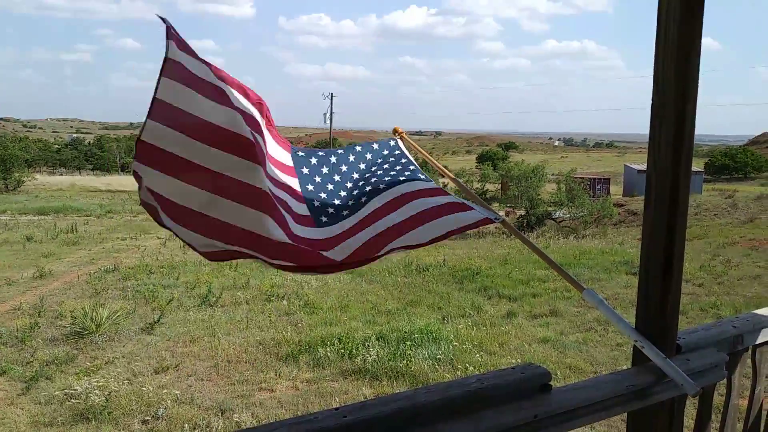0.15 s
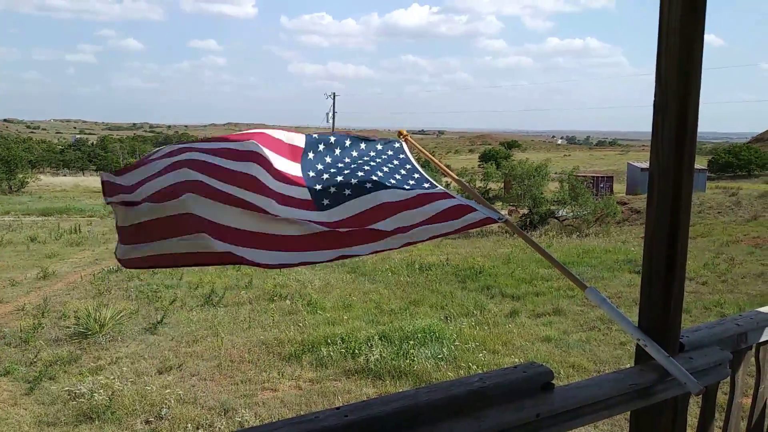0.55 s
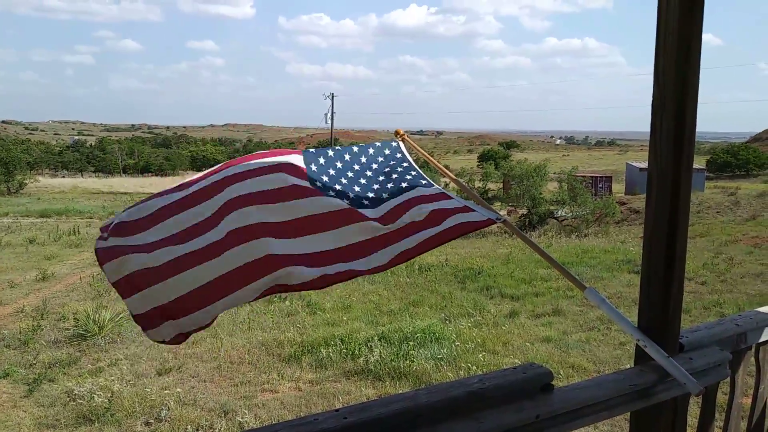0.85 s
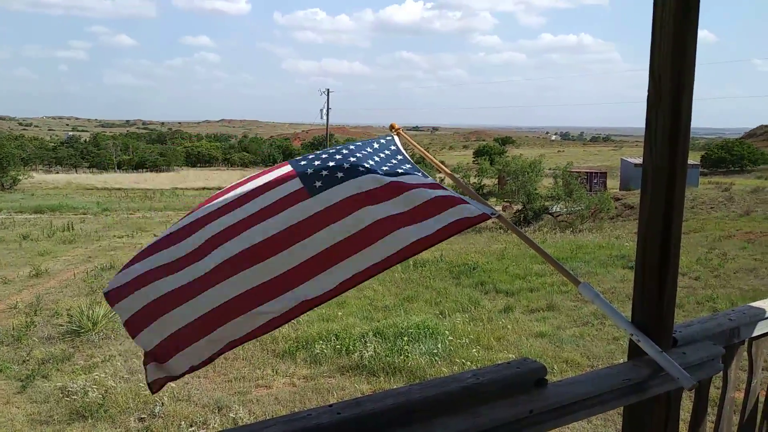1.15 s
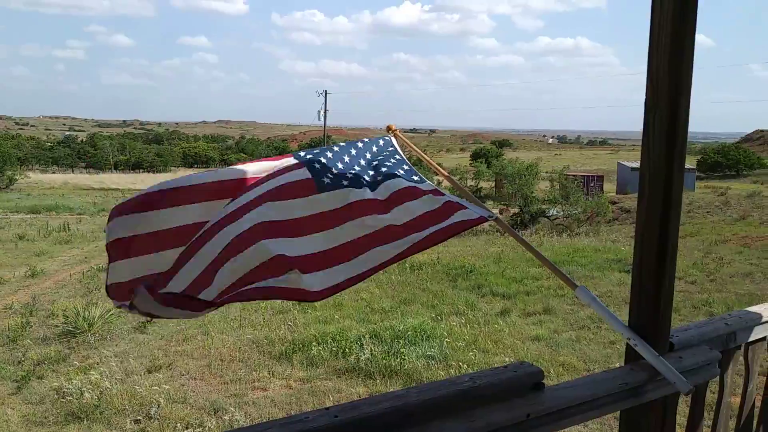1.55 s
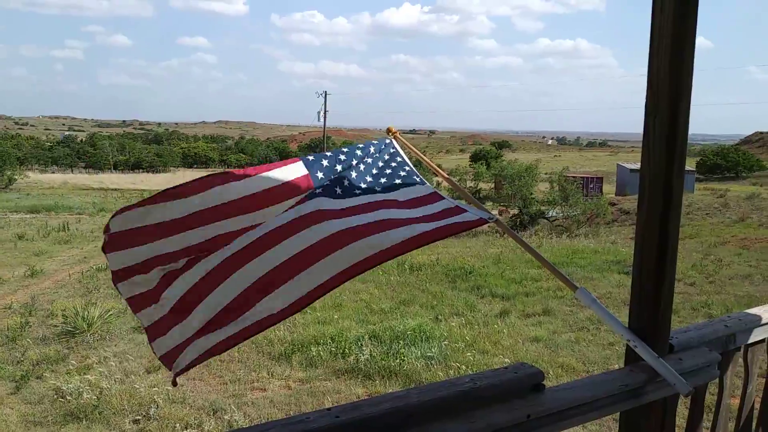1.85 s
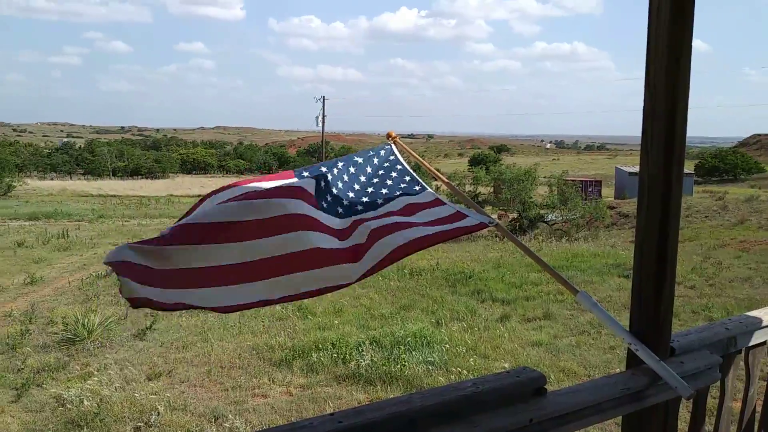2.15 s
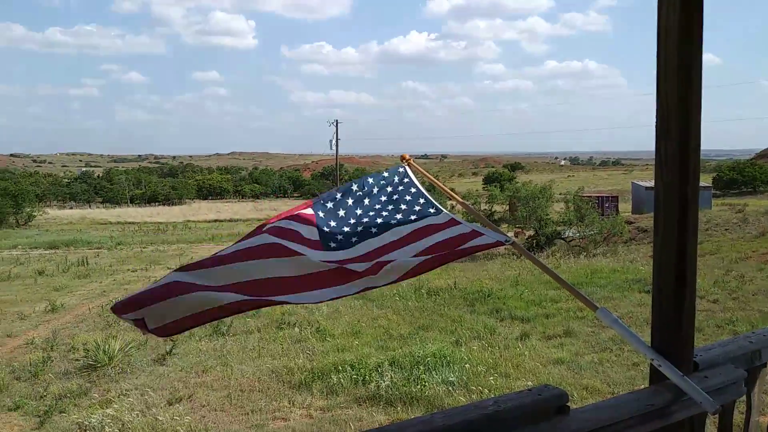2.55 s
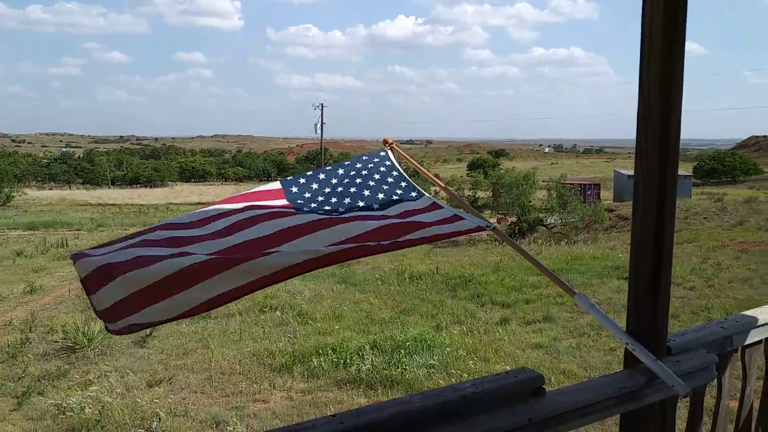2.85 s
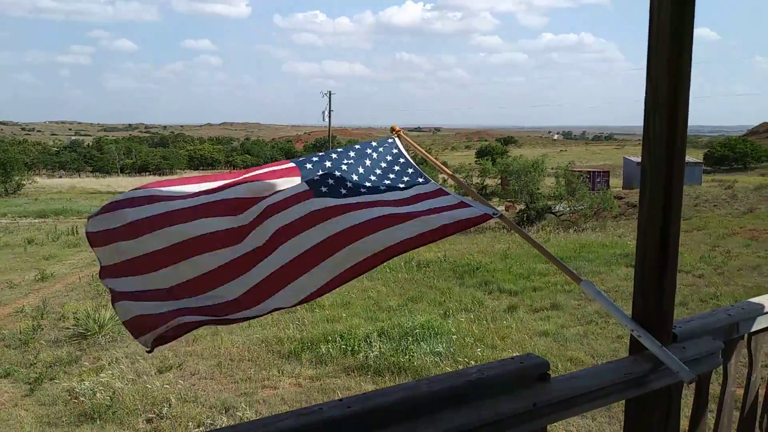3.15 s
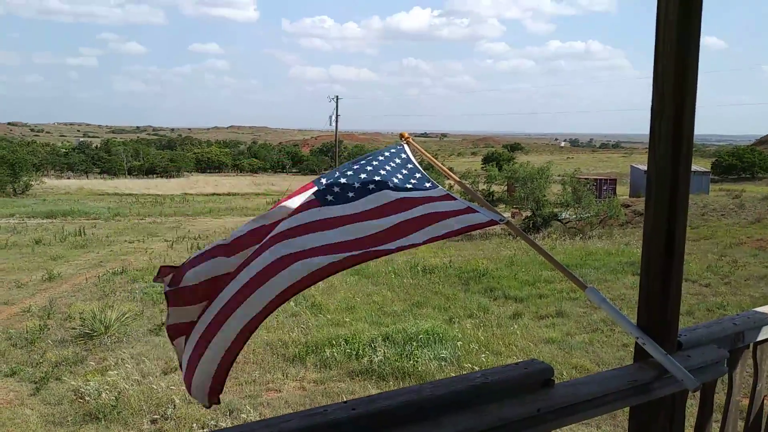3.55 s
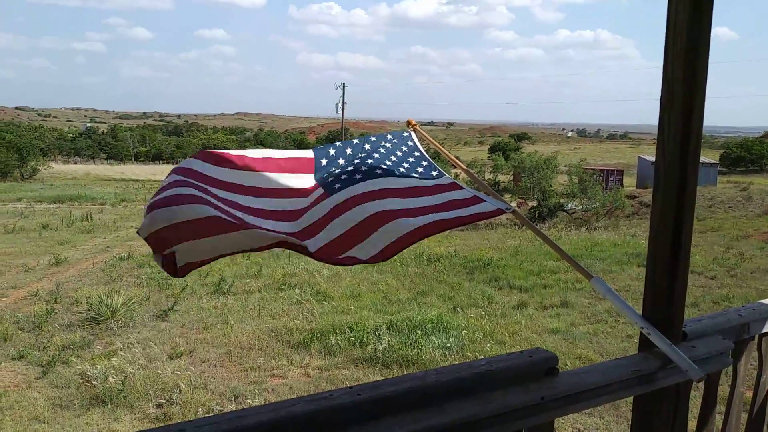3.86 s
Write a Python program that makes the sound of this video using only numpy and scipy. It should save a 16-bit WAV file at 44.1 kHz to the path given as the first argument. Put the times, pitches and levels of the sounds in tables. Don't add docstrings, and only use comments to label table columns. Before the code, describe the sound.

Outdoor wind noise beside a cloth flag: quiet rumble and faint ticks for nearly two seconds, then a sudden overloaded gust with heavy slaps, later scattered thumps fading to light rush and faint bird chirps.

```python
import sys
import numpy as np
from scipy import signal
from scipy.fft import rfft, irfft
from scipy.io import wavfile
from scipy.ndimage import uniform_filter1d, minimum_filter1d

SR = 44100
rng = np.random.default_rng(int(sys.argv[2]) if len(sys.argv) > 2 else 0)


def voltage_ratio(level):
    return 10 ** (np.asarray(level, float) / 20)


def bounce(signal):
    frames = np.transpose(np.atleast_2d(signal))
    limited = np.clip(frames, -1, 1)
    pcm = np.round(limited * 32767).astype(np.int16)
    wavfile.write(sys.argv[1], SR, pcm)


N = 176400

# (centre [s], width [s], level [dB], edge of the rumble [Hz])
LIGHT_EDDIES = [(0.056, 0.05, -24, 197), (0.108, 0.053, -25.5, 209), (0.178, 0.058, -27, 180),
                (0.615, 0.017, -22, 237), (0.712, 0.034, -25.5, 233), (1.159, 0.047, -25.5, 314),
                (1.214, 0.049, -26, 190), (1.278, 0.02, -20.5, 268), (1.462, 0.015, -25, 280),
                (1.615, 0.023, -32, 188)]
GUST_EDDIES = [(1.914, 0.019, -9.5, 246), (1.959, 0.067, -6, 347), (2.008, 0.03, -1, 380),
               (2.051, 0.025, -6.5, 240), (2.13, 0.019, 2.5, 640), (2.152, 0.013, 7, 272),
               (2.174, 0.008, -4, 284), (2.201, 0.034, -3, 365), (2.291, 0.011, -8.5, 426),
               (2.347, 0.028, -6, 450), (2.376, 0.018, -8.5, 510), (2.421, 0.035, -8, 390),
               (2.447, 0.0057, -6.5, 338), (2.501, 0.014, -6.5, 246), (2.52, 0.025, -7, 487),
               (2.554, 0.027, -5.5, 267), (2.61, 0.046, -11.5, 250), (2.647, 0.015, 0, 196),
               (2.674, 0.014, 2, 261), (2.739, 0.0096, -5.5, 290), (2.829, 0.052, -14.5, 370),
               (2.862, 0.004, -13.5, 257), (2.893, 0.0068, -8, 236),
               (2.964, 0.035, -13, 410), (3.004, 0.0046, -8, 405), (3.048, 0.0092, -12.5, 415),
               (3.061, 0.032, -9.5, 233), (3.098, 0.0069, -16, 410), (3.14, 0.019, -1, 336),
               (3.16, 0.0054, 4, 303), (3.187, 0.014, -9.5, 262), (3.256, 0.011, -18, 225),
               (3.299, 0.012, -9, 257), (3.327, 0.03, -13, 256), (3.409, 0.052, -9.5, 258),
               (3.482, 0.0083, -7.5, 220), (3.545, 0.044, -18, 249), (3.58, 0.018, -7, 287),
               (3.614, 0.039, -12, 356), (3.69, 0.036, -27, 217), (3.768, 0.021, -22, 362),
               (3.826, 0.021, -21, 333), (3.864, 0.014, -15.5, 348), (3.908, 0.025, -12.5, 178),
               (3.96, 0.087, -25.5, 219)]
EDDY_FLOOR_HZ, EDDY_EDGE_SHARE, EDDY_FALL = 49, 0.89, 1.78
EDDY_LUMPS_DB, EDDY_FIZZ_DB, FIZZ_REACH = 4, -31.5, 3.5

# (time [s], height over full scale [dB], pitch [Hz], gain afterwards [dB])
SLAPS = [
    (1.9624, -3, 250, -2),
    (1.9696, 1, 330, -7),
    (2.0072, 6, 300, -8.5),
    (2.1400, 8, 350, -4),
    (2.1545, 4, 200, -7),
    (2.2920, 1, 300, -7),
    (2.4222, 20, 360, -7.5),
    (2.6440, -1, 160, -4),
    (3.1600, 0, 180, -2.5),
    (3.5784, 0, 200, -2.5),
]

# (time [s], peak [dB], edge [Hz], length [s])
FLUTTERS = [(1.892, -24, 700, 0.018), (1.939, -20, 800, 0.011), (1.956, -13, 1000, 0.019),
            (2.003, -2.5, 653, 0.0061), (2.077, -30.5, 700, .012), (2.096, -20, 693, 0.013),
            (2.121, 4.5, 1060, 0.011), (2.139, -0.5, 1100, 0.011), (2.191, -9.5, 650, 0.013),
            (2.285, -9.5, 515, .009), (2.346, -11.5, 800, 0.0084), (2.364, -22.5, 900, .006),
            (2.377, -11.5, 1200, 0.0046), (2.418, -2.5, 900, 0.0081), (2.502, -15.5, 600, 0.0085),
            (2.518, -6.5, 950, 0.012), (2.532, -12, 900, 0.01), (2.584, -23.5, 650, 0.014),
            (2.61, -17, 704, 0.016), (2.641, -15.5, 750, 0.0088), (2.667, -12, 750, 0.013),
            (2.732, -23.5, 650, 0.014), (2.812, -18.5, 700, .01), (2.834, -18.5, 750, 0.021),
            (2.888, -23, 690, 0.015), (2.9, -20, 800, 0.0087), (2.949, -17, 600, 0.019),
            (2.993, -19, 600, .008), (3.048, -12.5, 680, 0.0099), (3.092, -22, 650, .012),
            (3.133, -12, 850, 0.0094), (3.151, -14, 900, 0.022), (3.321, -20, 520, 0.013),
            (3.374, -29, 650, .013), (3.569, -20.5, 600, 0.023), (3.603, -19.5, 600, 0.017)]
FLUTTER_RISE_S, FLUTTER_FALL = 0.002996, 1.603
FLUTTER_FLOOR_HZ, FLUTTER_CEILING_HZ = 380, 3800

# (time [s], level [dB])
TURBULENCE_LEVEL = [(0, -26.5), (.2, -43), (.27, -66), (.6, -42), (.85, -59), (1.08, -35), (1.2, -28),
                    (1.5, -35.5), (1.7, -46), (1.86, -31), (1.9, -15), (2.3, -13.5), (2.6, -12),
                    (2.78, -20), (3.17, -14), (3.23, -29.5), (3.45, -18.5), (4, -31.5)]
# (frequency [Hz], level [dB])
PORT_SPECTRUM = [(25, -39), (45, 2.5), (65, 2.5), (200, -2), (400, -13), (800, -27), (2000, -46),
                 (5000, -110)]

# (time [s], level [dB])
RUSH_LEVEL = [(0, -37), (1, -37), (2, -37.5), (3, -40), (4, -38)]
# (time [s], level [dB])
GRASS_LEVEL = [(0, -57), (.8, -57), (1.8, -57.5), (2.3, -56), (2.7, -58), (3, -55), (3.4, -56.5), (4, -57)]
# (frequency [Hz], level [dB])
TREE_SPECTRUM = [(30, -11), (100, 4), (250, 5), (500, -4.5), (800, 2), (1500, -12), (2600, -13)]
GRASS_SPECTRUM = [(2950, -35), (3600, -21.5), (4400, -28.5), (5100, -30), (6700, -24), (9500, -31.5),
                  (12800, -48.5), (15800, -53)]
# (resonance [Hz], width [Hz], level [dB])
HOLLOWS = [(302, 11, -8.5), (410, 10, -6.5), (640, 31.4, -1.5), (750, 16, -10), (899, 51, -3.5),
           (1202, 100, -6), (1397, 12, -10), (1725, 59, -11.5), (1924, 130, -11.5), (2470, 64, -19),
           (2720, 120, -20)]

# (time [s], peak [dB], resonance [Hz], 60 dB decay [s])
TICKS = [
    (.1062, -39, 3850, .02),
    (0.416, -39, 3770, 0.046),
    (.432, -46, 5000, 0.027),
    (.765, -47, 5000, .02),
    (1.075, -38, 4700, 0.018),
    (1.285, -49, 4500, 0.0195),
    (1.665, -44, 4600, 0.022),
    (3.2206, -43, 3900, 0.017),
    (3.4887, -42, 9930, .014),
    (3.489, -38, 6300, 0.01),
]

# (start [s], length [s], start pitch [Hz], end pitch [Hz], level [dB])
CHIRPS = [
    (1.9, .03, 4200, 4550, -52),
    (2.925, .022, 4350, 4150, -55),
    (3.03, .025, 4350, 4150, -55),
    (3.06, .03, 3900, 3750, -59),
    (3.1, .05, 4250, 4250, -60),
    (3.56, .025, 4150, 4250, -58),
    (3.61, .035, 3950, 4150, -56),
    (3.78, .06, 4050, 4100, -59),
    (3.86, .075, 4180, 4320, -58),
]

# (time [s], level [dB])
INSECT_LEVEL = [(0, -83), (.5, -77), (.9, -80), (1.6, -78), (2, -82), (2.2, -89), (3.2, -85), (3.5, -78),
                (4, -82)]
INSECT_HZ, INSECT_PULSES_PER_S = 15400, 28

FULL_SCALE, BASS_CUT_HZ, CUTOFF_HZ = .893, 50, 15730
LIMITER_SHARE, LIMITER_SPAN = .8, 220
RECOVERY_DB_PER_S, GAIN_ATTACK_S = 32, .0015


def rms_one(x):
    return x / np.sqrt(np.mean(x ** 2) + 1e-20)


def in_time(rows):
    s, v = np.transpose(rows)
    return np.interp(np.arange(N) / SR, s, v)


def drift(rate):
    r = np.exp(-80 * np.pi * rate / SR)
    noise = rng.standard_normal(N // 40 + 2002)
    slow = signal.lfilter([1], [1, -2 * r, r * r], noise)[2000:]
    return np.interp(np.arange(N) / 40, np.arange(len(slow)), rms_one(slow))


def coloured(points):
    hz, db = np.transpose(points)
    grid_hz = np.arange(N // 2 + 1) * SR / N
    return voltage_ratio(np.interp(np.log(grid_hz + 1), np.log(hz), db))


def patchy(shape, shared_db, own_db, rate):
    octave = np.log2(np.arange(N // 2 + 1) * SR / N + 1)
    spectrum = rfft(rng.standard_normal(N)) * shape
    together, out = drift(rate), 0
    for centre in range(4, 15):
        share = np.clip(1 - abs(octave - centre), 0, 1)
        swell = voltage_ratio(shared_db * together + own_db * drift(rate))
        out = out + irfft(spectrum * share, N) * swell
    return rms_one(out)


def resonate(x, hz, width_hz):
    r = np.exp(-np.pi * width_hz / SR)
    zeros = np.array([1, 0, -1]) * (1 - r * r) / 2
    poles = [1, -2 * r * np.cos(2 * np.pi * hz / SR), r * r]
    return signal.lfilter(zeros, poles, x)


def eddies():
    out, f = np.zeros(N), np.arange(4097) * SR / 8192
    lumps = voltage_ratio(EDDY_LUMPS_DB * np.array([drift(87), drift(180)]))
    air = np.pad(rng.standard_normal((2, N)) * lumps, [(0, 0), (4096, 4096)])
    bell_time = (np.arange(8192) - 4096) / SR
    falls = np.array([[EDDY_FALL / 2], [1.45]])
    for s, width, db, hz in LIGHT_EDDIES + GUST_EDDIES:
        start = int(s * SR)
        bell = np.exp(-4 * np.log(2) * (bell_time / width) ** 2)
        edges = np.array([[EDDY_EDGE_SHARE], [FIZZ_REACH]]) * hz
        colour = (1 + (f / edges) ** 4.0) ** -falls
        colour = colour * f ** 2 / (f ** 2 + (.33 * hz) ** 2)
        colour = colour * f ** 2 / (f ** 2 + EDDY_FLOOR_HZ ** 2)
        low, fizz = irfft(rfft(air[:, start:start + 8192]) * colour)
        puff = bell * (low + voltage_ratio(EDDY_FIZZ_DB) * fizz * bell)
        puff = voltage_ratio(db) * puff / np.sqrt(np.sum(puff ** 2) / np.sum(bell ** 2))
        out[max(start - 4096, 0):start + 4096] += puff[max(4096 - start, 0):4096 + N - start]
    return out


def slaps():
    t, out = np.arange(N) / SR, np.zeros(N)
    for s, db, hz, _ in SLAPS:
        cycles = hz * (t - s)
        out -= voltage_ratio(db) * np.sin(2 * np.pi * cycles) * np.exp(-2.5 * cycles ** 2)
    return out


def flutters():
    out, t, f = np.zeros(N + 4096), np.arange(4096) / SR, np.arange(2049) * SR / 4096
    for (s, db, hz, length), noise in zip(FLUTTERS, rng.standard_normal((len(FLUTTERS), 4096))):
        colour = (1 + (f / hz) ** 5.4) ** (-FLUTTER_FALL / 2)
        colour = colour * f ** 4 / (f ** 4 + FLUTTER_FLOOR_HZ ** 4)
        colour = colour / (1 + (f / FLUTTER_CEILING_HZ) ** 6)
        rise = 1 - np.exp(-(t / FLUTTER_RISE_S) ** 2)
        flare = irfft(rfft(noise) * colour) * rise * np.exp(-(t / length) ** 2)
        start = int((s - FLUTTER_RISE_S) * SR)
        out[start:start + 4096] += voltage_ratio(db) * flare / abs(flare).max()
    return out[:N]


def turbulence():
    rumble = patchy(coloured(PORT_SPECTRUM), shared_db=1.5, own_db=2.0, rate=25)
    return voltage_ratio(in_time(TURBULENCE_LEVEL)) * rumble


def rush():
    trees = patchy(coloured([*TREE_SPECTRUM, (3300, -50)]), shared_db=.4, own_db=.5, rate=8)
    grass = patchy(coloured([(2300, -55), *GRASS_SPECTRUM]), shared_db=0.5, own_db=1.2, rate=6.9)
    song = np.zeros(N)
    for hz, width, db in HOLLOWS:
        whistle = rms_one(resonate(rng.standard_normal(N), hz, width))
        song += voltage_ratio(db + 0.79 * drift(4.1)) * whistle
    return voltage_ratio(in_time(RUSH_LEVEL)) * (trees + voltage_ratio(-4.5) * song) + voltage_ratio(in_time(GRASS_LEVEL)) * grass


def flag():
    out, t = np.zeros(N + SR), np.arange(4000) / SR
    for (s, db, hz, t60), noise in zip(TICKS, rng.standard_normal((len(TICKS), len(t)))):
        puff = noise * voltage_ratio(-60 * t / t60)
        tick = resonate(resonate(puff, hz, 0.58 * hz), hz, 0.58 * hz)
        start = int(s * SR)
        out[start:start + len(t)] += voltage_ratio(db) * tick / abs(tick).max()
    return out[:N]


def bird():
    out, t, flutter = np.zeros(N), np.arange(N) / SR, voltage_ratio(3.5 * drift(120))
    for s, length, from_hz, to_hz, db in CHIRPS:
        u = np.clip((t - s) / length, 0, 1)
        cycles = length * (from_hz * u + (to_hz - from_hz) * u * u / 2)
        out += voltage_ratio(db) * np.sin(np.pi * u) * np.sin(2 * np.pi * cycles)
    return out * flutter


def insect():
    phase = np.cumsum(INSECT_PULSES_PER_S * (1 + .15 * drift(8))) / SR
    gate = (.5 + .5 * np.cos(2 * np.pi * phase)) ** 1.5 * voltage_ratio(2.5 * drift(10))
    hiss = resonate(resonate(rng.standard_normal(N), INSECT_HZ, 1300), INSECT_HZ, 1300)
    return voltage_ratio(in_time(INSECT_LEVEL)) * rms_one(gate * hiss)


def scene():
    wind = eddies() + slaps() + flutters() + turbulence()
    return (wind + rush() + flag() + bird() + insect())[None]


def roll_off(x):
    return signal.sosfilt(signal.butter(12, 17070, fs=SR, output="sos"), x)


def record(dry):
    t = np.arange(N) / SR
    gains = []
    for s, _, hz, db in SLAPS:
        recovery = np.minimum(db + RECOVERY_DB_PER_S * (t - s), 0)
        gains.append(np.where(t > s + .5 / hz, recovery, 0))
    r = np.exp(-1 / (GAIN_ATTACK_S * SR))
    gain_db = signal.lfilter([1 - r], [1, -r], np.min(gains, axis=0))
    bass_cut = signal.butter(4, BASS_CUT_HZ, "high", fs=SR, output="sos")
    x = signal.sosfilt(bass_cut, dry) * voltage_ratio(gain_db)

    in_slap = np.any([abs(t - s) < 1 / hz for s, _, hz, _ in SLAPS], axis=0)
    share = np.where(in_slap, LIMITER_SHARE, 1.03)
    peak = -minimum_filter1d(-abs(x), size=LIMITER_SPAN)
    over = np.maximum(peak / FULL_SCALE, 1)
    x = x * uniform_filter1d(over ** -share, size=LIMITER_SPAN)
    x = np.clip(x, -FULL_SCALE, FULL_SCALE)
    x = irfft(rfft(x) * (np.arange(N // 2 + 1) * SR / N < CUTOFF_HZ), N)
    return roll_off(x)


dry = scene()
out = record(dry)
bounce(out)
```